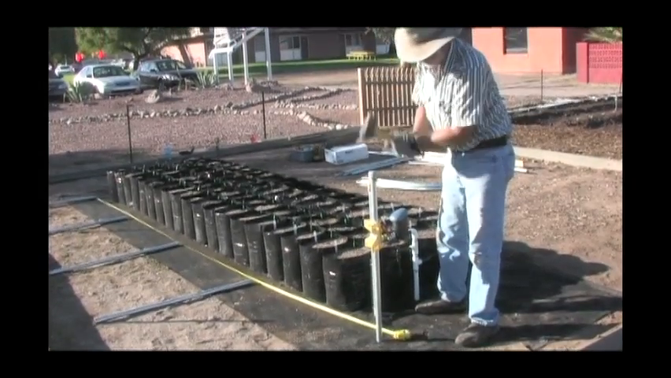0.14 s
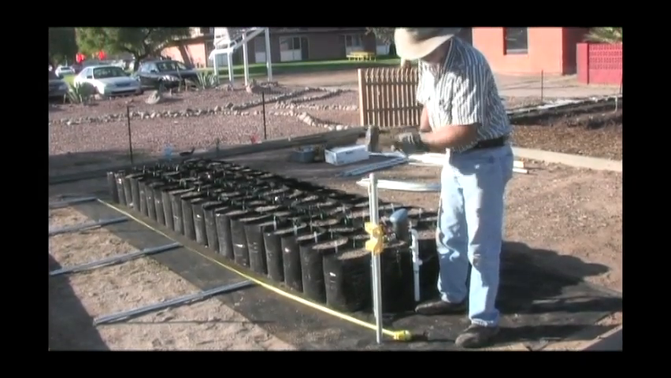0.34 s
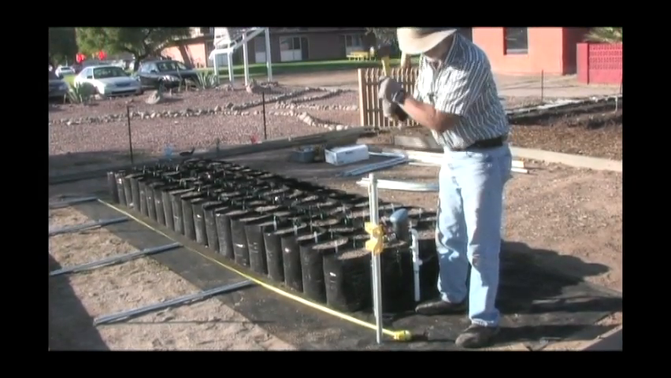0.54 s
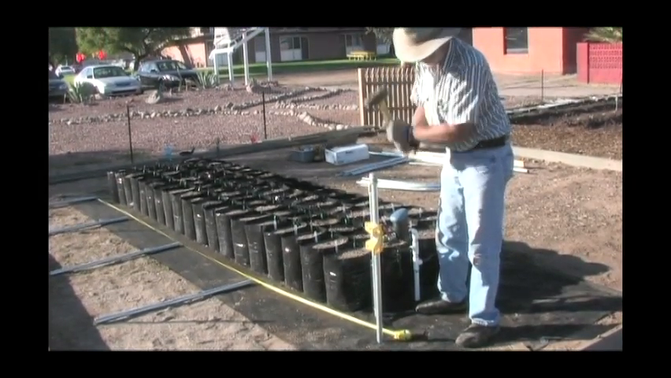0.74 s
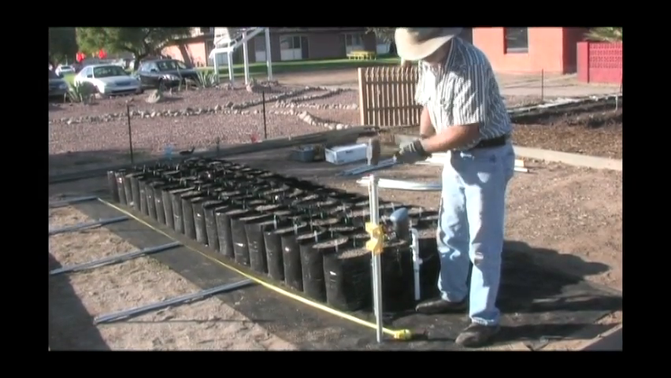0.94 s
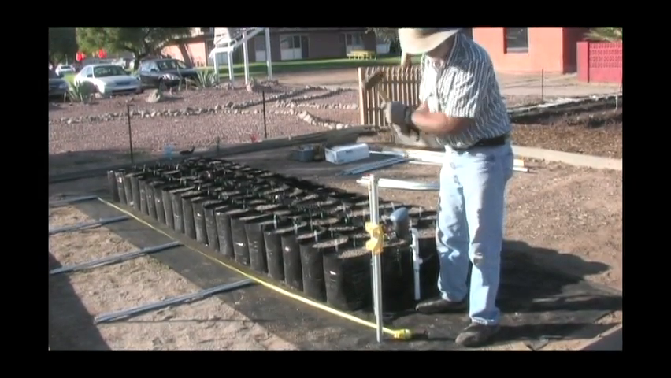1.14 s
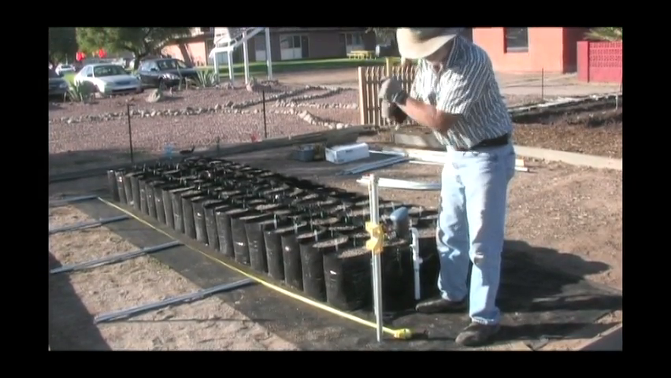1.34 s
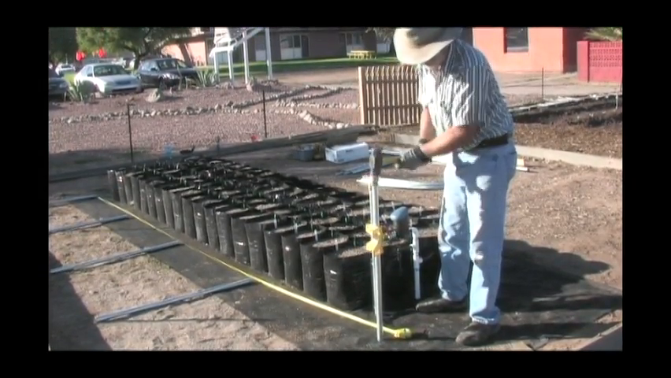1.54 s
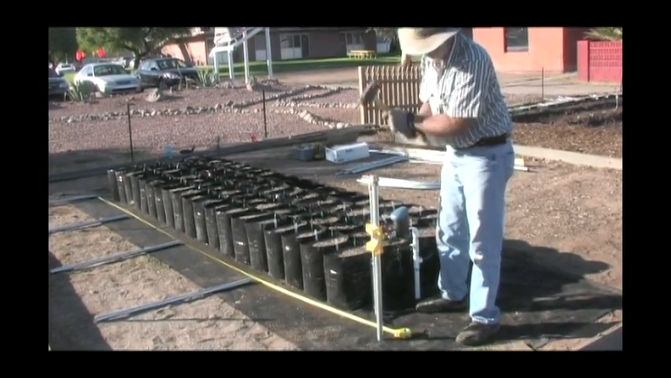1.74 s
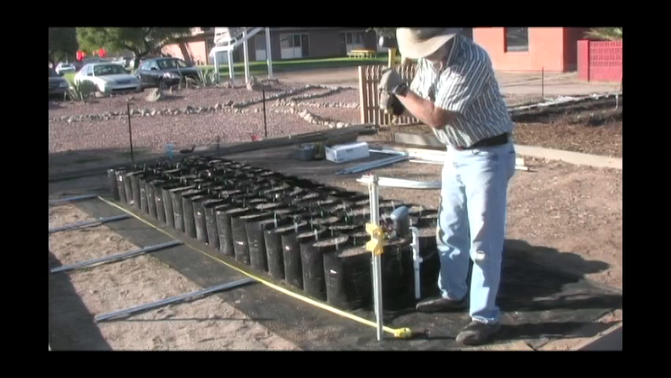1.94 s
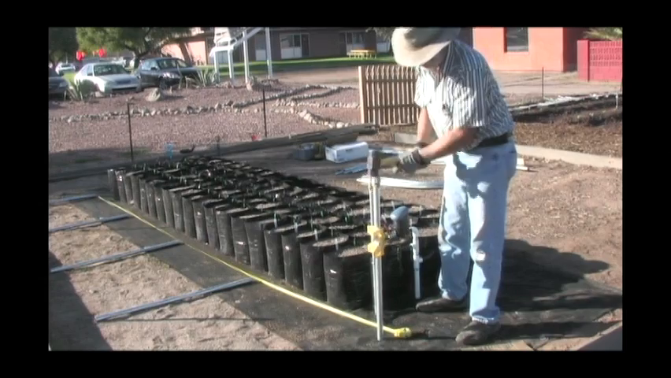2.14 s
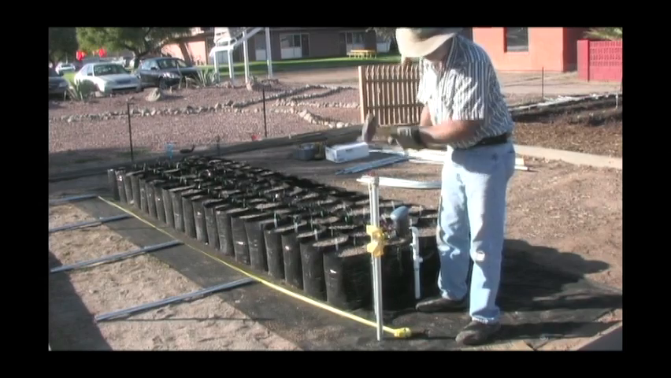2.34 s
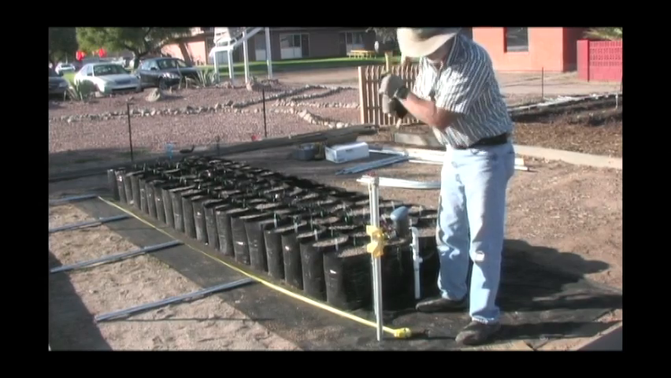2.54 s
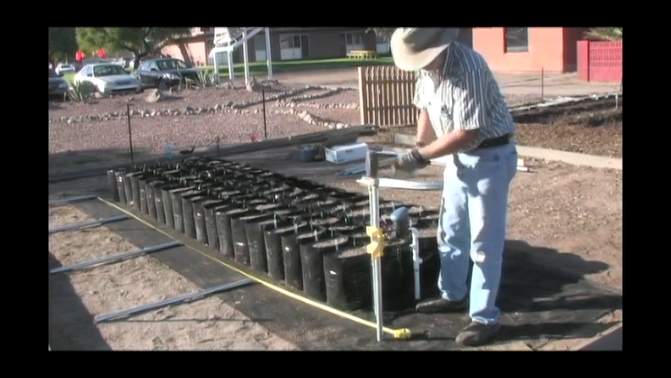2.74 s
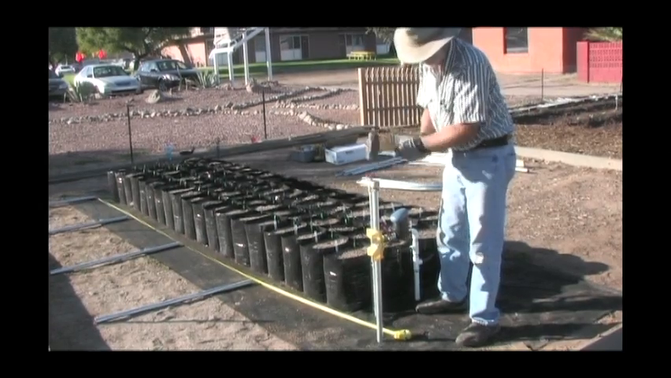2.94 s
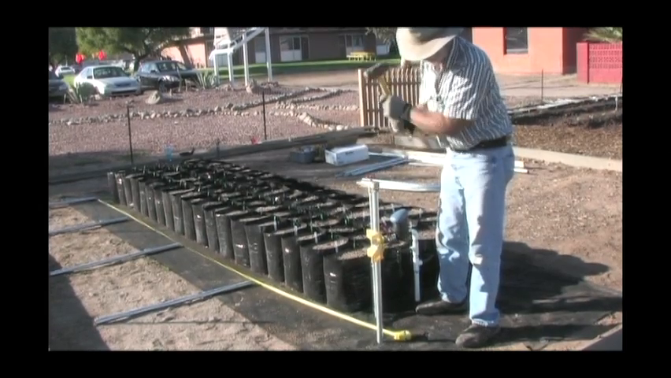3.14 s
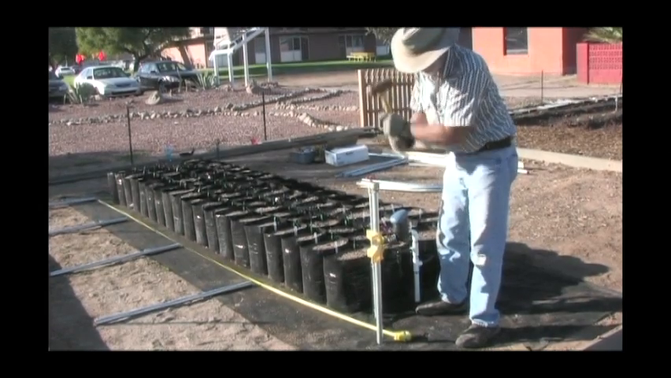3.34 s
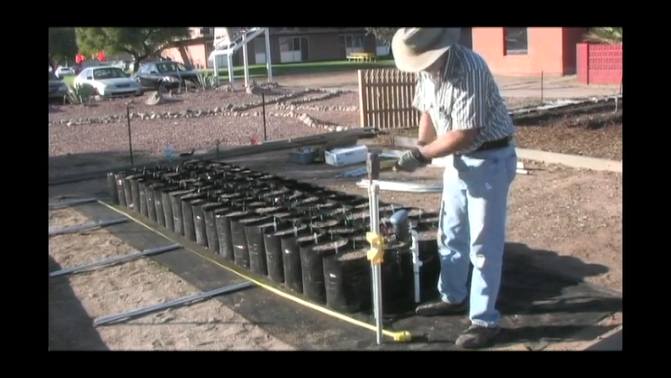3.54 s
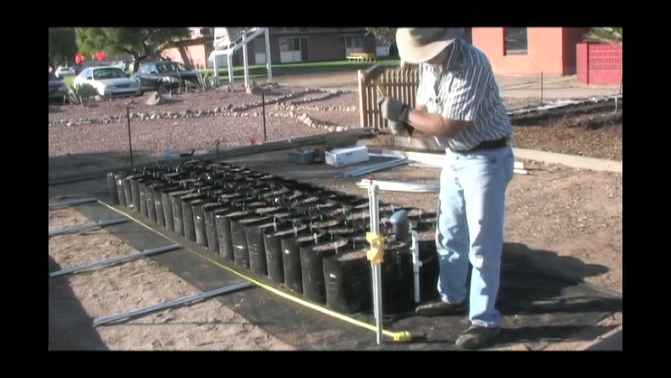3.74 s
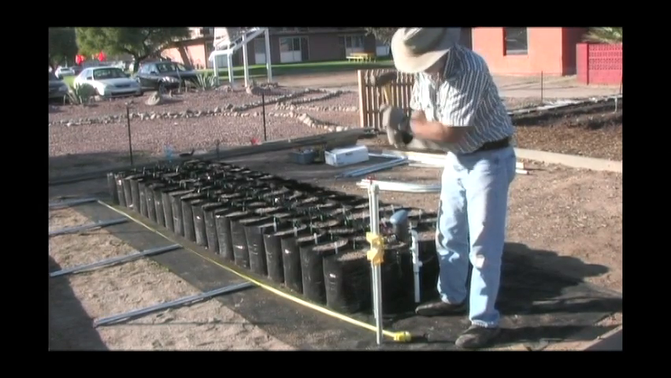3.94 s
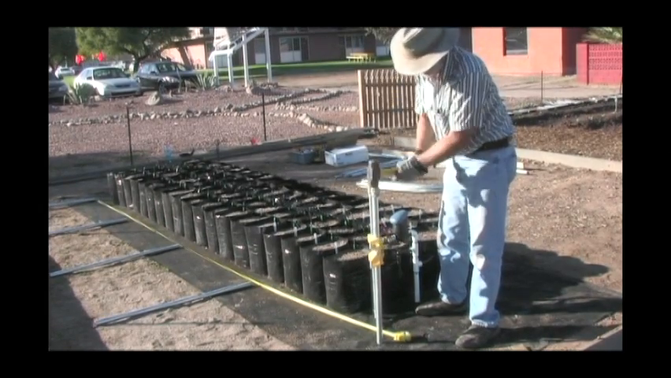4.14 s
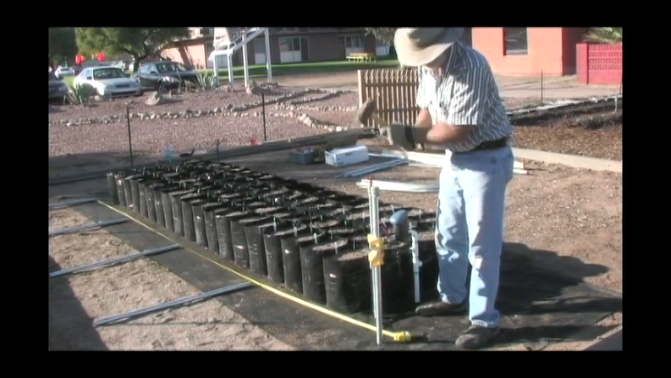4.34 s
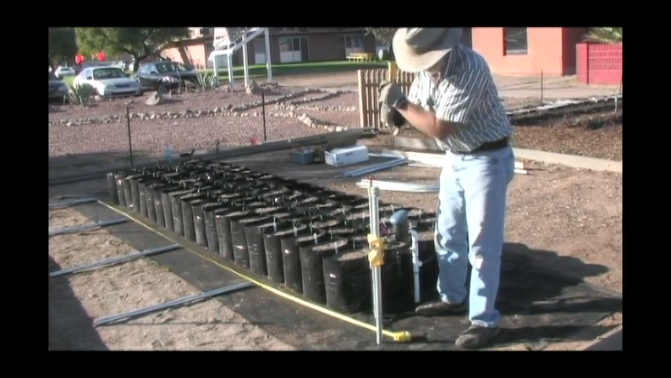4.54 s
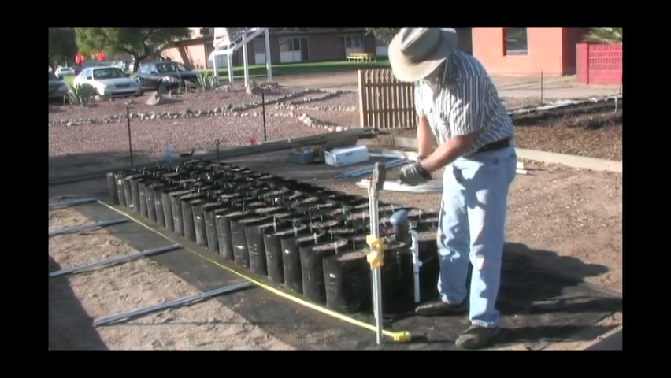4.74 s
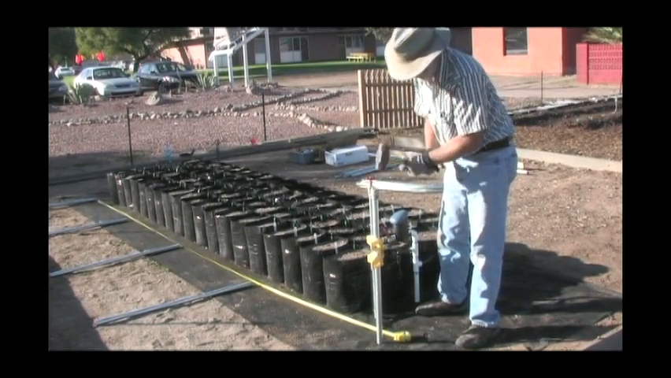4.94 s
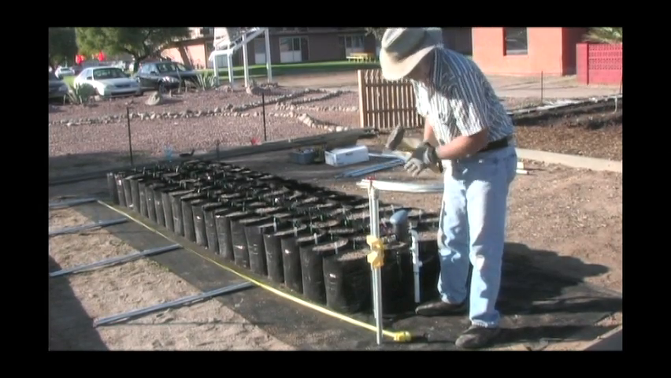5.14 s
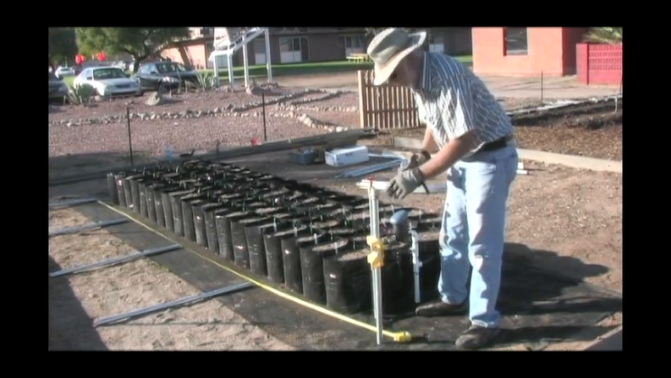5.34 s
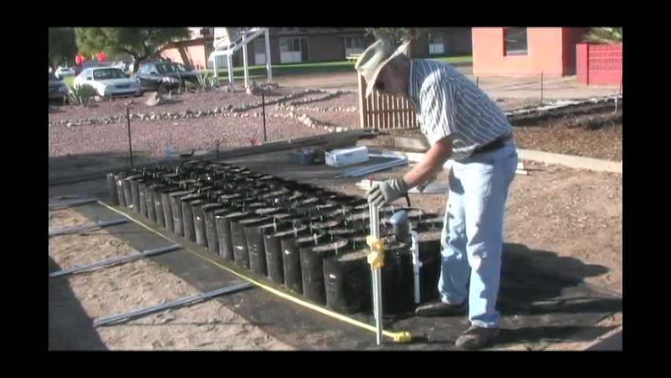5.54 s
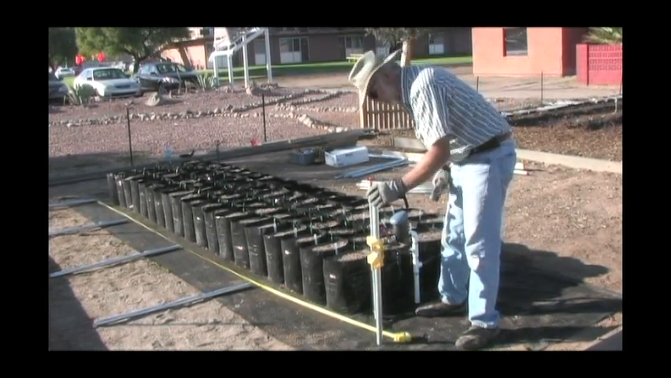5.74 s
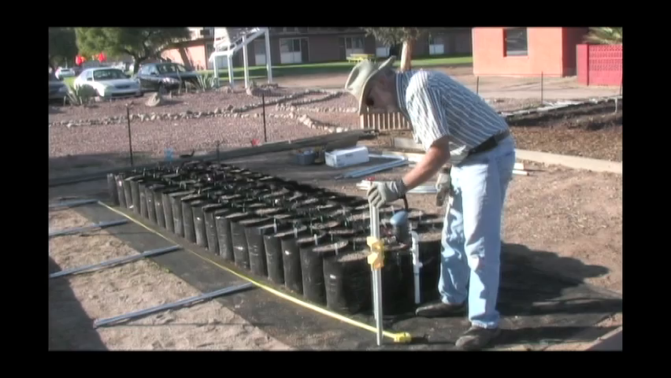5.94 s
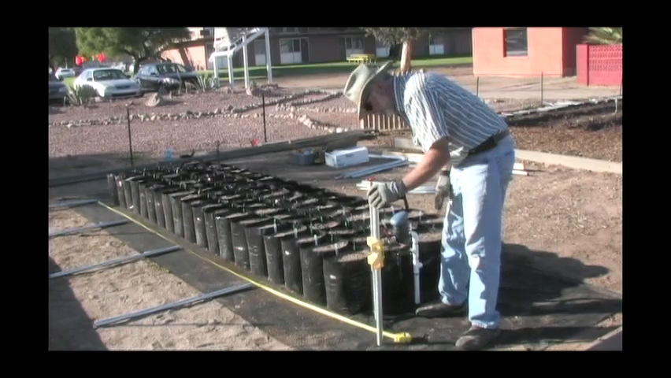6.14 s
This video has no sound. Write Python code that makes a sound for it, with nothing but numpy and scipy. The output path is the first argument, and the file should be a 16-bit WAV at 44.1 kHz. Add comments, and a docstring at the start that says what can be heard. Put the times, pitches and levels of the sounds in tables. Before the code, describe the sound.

The tail of an earlier blow opens the scene, then eight steady, hard steel clanks ring out close by, each short and crashing with a thin high ring and grainy outdoor echoes. The microphone distorts on the impacts and its level dips, then swells back. After the last blow only light metallic taps, dull shoe scuffs, a thin wavering far tone and faint town rumble remain.

```python
"""A garden yard among buildings: a hand sledge drives a steel post into a bed, over a far rumble of town.
Eight hard clanks follow the tail of an earlier one; light taps and faint ticks follow as a hand takes hold.
Each blow is a noise crash plus decaying sine modes, singing on near 4.7 kHz; scuffs are filtered noise.
Noise echoes form the yard, shaped noise the town, and a wavering sine a thin far tone.
The clanks overload the microphone; its gain control ducks and swells back up through the echoes."""
import sys
import numpy as np
from scipy import signal
from scipy.fft import rfft, irfft, next_fast_len
from scipy.io import wavfile
from scipy.ndimage import uniform_filter1d

SR = 44100
rng = np.random.default_rng(int(sys.argv[2]) if len(sys.argv) > 2 else 0)


def to_wav(s):
    """Save 16-bit WAV."""
    ch = np.atleast_2d(s).T  # columns
    pcm = np.round(np.clip(ch, -1, 1) * 32767)  # PCM
    wavfile.write(sys.argv[1], SR, pcm.astype(np.int16))


N = 277344


def from_db(db):
    """Amplitude ratio of a level in dB."""
    return 10 ** (np.asarray(db) / 20)


def unit_energy(x):
    """Scale each row to a sum of squares of 1."""
    return x / np.sqrt(np.sum(x ** 2, axis=-1, keepdims=True) + 1e-20)


def at_hz(points, hz):
    """Read a spectrum on a log-frequency axis."""
    points = np.array(points)
    return np.interp(np.log(hz + 1), np.log(points[:, 0]), points[:, 1])


def fade(t, t60):
    """Exponential decay, 60 dB down after t60 seconds."""
    return from_db(-60 * t / t60)


def burst(t, t60):
    """Dying noise of unit energy."""
    return unit_energy(rng.standard_normal(len(t)) * fade(t, t60))


def colour(x, spectrum):
    """Causal (minimum-phase) filter with the given spectrum."""
    n = 2 * next_fast_len(x.shape[-1])
    level_db = at_hz(spectrum, np.fft.rfftfreq(n, 1 / SR))
    cepstrum = irfft(np.log(from_db(level_db)))
    # fold the cepstrum onto positive times
    cepstrum[1:n // 2] *= 2
    cepstrum[n // 2 + 1:] = 0
    response = np.exp(rfft(cepstrum))
    return irfft(rfft(x, n) * response)[..., :x.shape[-1]]


def high_pass(x, hz, order=2):
    """Take away what lies below hz."""
    return signal.sosfilt(signal.butter(order, hz, "high", fs=SR, output="sos"), x)


def drift(per_s):
    """Slow chance over the whole scene: a new value per_s times a second, joined by lines."""
    return np.interp(np.arange(N) / SR * per_s, np.arange(N), rng.standard_normal(N))


def town(level_db=-46, left_db=0.87):
    """Steady far traffic and air: shaped noise, left and right most alike near 1 kHz."""
    # rumble spectrum: (frequency [Hz], relative level [dB])
    town_spectrum = [(20, -22), (40, -8.5), (62, 0), (130, -3), (250, -4.5), (700, -6), (1200, -12),
                     (2000, -18), (3200, -21.5), (5000, -39), (8000, -40.5), (15000, -44)]
    # left-right correlation: (frequency [Hz], correlation [-1 to 1])
    likeness = [(60, 0.1), (240, 0.099), (950, 0.33), (4000, .1)]
    hz = np.fft.rfftfreq(N, 1 / SR)
    alike = np.clip(at_hz(likeness, hz), -1, 1)
    mid, side = rfft(rng.standard_normal((2, N)))
    both = np.sqrt(1 + alike) * mid + np.sqrt(1 - alike) * side * [[1], [-1]]
    shaped = irfft(both * from_db(at_hz(town_spectrum, hz)), N)
    noise = unit_energy(shaped) * np.sqrt(N)  # unit RMS
    return noise * from_db(level_db + left_db * np.array([[1], [-1]]))


def whine(hz=2945, waver_hz=5, flutter_db=2, per_s=25, rest_db=-70.5, fade_s=0.061):
    """A thin far tone, wavering in pitch and level; swells rise where they exceed its rest level."""
    # swells of the tone: (start [s], length [s], level before flutter [dB])
    swell_times = [(5.451, 0.26, -64.5), (5.902, 0.27, -70.5)]
    t = np.arange(N) / SR
    phase = 2 * np.pi * np.cumsum(hz + waver_hz * drift(per_s)) / SR
    tone = np.sqrt(2) * np.sin(phase)
    swells = 0
    for start_s, length_s, db in swell_times:
        edge_s = np.minimum(t - start_s, start_s + length_s - t)
        swells = swells + from_db(db) * np.clip(edge_s / fade_s, 0, 1)
    flutter = from_db(flutter_db * drift(per_s))
    return np.maximum(from_db(rest_db), swells) * flutter * tone


def echo(t, delay_s, t60, low_hz, order=2, rise_s=0.0037):
    """One smeared reflection of a click, without its lows."""
    smear = unit_energy(burst(t, t60) * (1 - np.exp(-t / rise_s)))
    return np.roll(high_pass(smear, low_hz, order=order), round(delay_s * SR))


def yard(near_db=-17.0, near_t60=0.25, far_db=-22.5, far_t60=1.0, build_s=0.033, grain_db=2.5):
    """Stereo response without the direct sound: scatter from ground and pots, wall echoes, a grainy far tail."""
    # walls around the yard: (echo delay [s], level before colouring [dB])
    wall_echoes = [(0.048, -30), (0.152, -27.5), (.169, -30), (0.233, -27.5), (.274, -41.5), (0.343, -42.5)]
    # colour of pots, walls and tail: (frequency [Hz], level [dB])
    yard_colour = [(100, -6), (900, -1), (2300, -3.5), (3200, 1.5), (5000, 4), (7000, -2.5), (10000, -1.5),
                   (15000, -21)]
    t = np.arange(SR) / SR
    # far surfaces differ in size: the tail comes in grains of a few milliseconds
    grains = from_db(grain_db * np.interp(t, np.linspace(0, 1, 300), rng.standard_normal(300)))
    sides = []
    for _ in range(2):
        near = from_db(near_db) * burst(t, near_t60)
        tail = grains * burst(t, far_t60) * (1 - np.exp(-t / build_s))
        far = from_db(far_db) * unit_energy(tail)
        pots = from_db(-14) * echo(t, delay_s=0.008, t60=0.093, low_hz=270)
        # rough faces smear each echo and return mostly the short waves
        walls = sum(from_db(db) * echo(t, delay_s, t60=0.022, low_hz=2400, order=1)
                    for delay_s, db in wall_echoes)
        sides.append(near + colour(far + pots + walls, yard_colour))
    return np.array(sides)


def scuffs(level_db=17, t60=0.1, low_hz=520, high_hz=780):
    """Dull, short rubs of a sole on the ground: band-passed dying noise."""
    # soft scuffs: (time [s], relative level [dB])
    rubs = [(5.341, -31.5), (6.064, -36.5), (6.111, -32.5), (6.127, -42)]
    t = np.arange(SR // 4) / SR
    band = signal.butter(2, [low_hz, high_hz], "band", fs=SR, output="sos")
    for s, db in rubs:
        rub = from_db(db + level_db) * unit_energy(signal.sosfilt(band, burst(t, t60)))
        yield s, (rub, rub)


def post_modes(t, sharp=0.01, settle_s=0.017, spread_db=1.5, detune=0.0017, build_s=0.0007):
    """Short clang and long singing of the post; each strike gives its modes new strengths and pitches."""
    # modes of the post; the soil damps most outside the singing cluster:
    # (frequency [Hz], relative level [dB], t60 [s])
    modes = [(1193, -2, 0.052), (1710, 3, 0.022), (2418, -2, 0.035), (3260, -3, 0.056), (3760, -3, 0.084),
             (4690, -26, .6), (4708, -24, .55), (4722, -23, .65), (4752, -22, .3), (4745, -12, .055),
             (4798, -18, .1), (5840, -13, 0.019), (7147, 1, 0.027), (9340, -7, 0.055)]
    clang, singing = np.zeros((2, len(t)))
    # the contact stiffens the post: the ring starts sharp by a small share and settles
    clock = t + sharp * settle_s * (1 - np.exp(-t / settle_s))
    for hz, db, t60 in modes:
        strength, shift = rng.standard_normal(2)
        swing = np.sin(2 * np.pi * (hz * (1 + detune * shift) * clock + rng.random()))
        mode = from_db(db + spread_db * strength) * fade(t, t60) * swing
        if 4600 < hz < 4900:
            singing += mode
        else:
            clang += mode
    return np.array([clang, singing]) * (1 - np.exp(-t / build_s))


def crash(t60, spectrum, rise_s=0.00014, spread_s=0.002009, size=4096, count=60):
    """Countless short modes, of unit energy; bending waves carry highs along the steel faster than lows."""
    t = np.arange(size) / SR
    khz = np.fft.rfftfreq(size, 1 / SR) / 1000
    modes = rfft(burst(t, t60) * (1 - np.exp(-t / rise_s)))
    # the hard contact feeds all pitches alike
    modes = modes / np.sqrt(uniform_filter1d(np.abs(modes) ** 2, count))
    # travel time falls with the root of frequency: scale spread_s at 1 kHz, zero at 16 kHz
    cycles = spread_s * 1000 * (2 * np.sqrt(khz) - khz / 4)
    wave = irfft(modes * np.exp(-2j * np.pi * cycles))[:size // 2]
    return unit_energy(colour(np.pad(wave, (0, SR - len(wave))), spectrum))


def handling_ticks(count=4, from_s=5.15, to_s=5.9, level_db=-66, spread_db=2.5, singing_db=-0.5):
    """The glove brushes the post: faint ticks at uneven times, as (time, level, singing) rows."""
    slots = (np.arange(count) + rng.random(count)) / count
    times = from_s + slots * (to_s - from_s)
    return [(s, level_db + spread_db * rng.standard_normal(), singing_db) for s in times]


def taps(crash_db=32, crash_t60=0.026, clang_db=-2, held_t60=0.22, thrown_db=-5):
    """Light knocks; the steel resting on the post bends and shortens its ring."""
    # knocks of steel on the post, rebounds among them:
    # (time [s], relative level [dB], relative singing level [dB])
    knocks = [(.243, -27.5, -10), (0.305, -28.5, 3), (2.837, -24, 10), (2.879, -33.5, 19),
              (4.126, -24.5, 0), (5.718, -52, 30.5), (5.763, -55.5, 2), (5.775, -47, 20),
              (5.929, -41.5, 21.5), (6.163, -77.5, 38)]
    # softer spectrum of a light knock: (frequency [Hz], relative level [dB])
    knock_spectrum = [(100, -27.5), (600, -10), (1000, -1), (2200, -2.5), (3800, -6.5), (5500, 1),
                      (7300, -4), (9500, -21.5), (15000, -31.5)]
    t = np.arange(SR) / SR
    for s, db, singing_db in [*knocks, *handling_ticks()]:
        clang, singing = post_modes(t, sharp=0.019)
        held_singing = from_db(singing_db) * singing * fade(t, held_t60)
        ring = from_db(clang_db) * clang + held_singing
        knock = from_db(db) * (from_db(crash_db) * crash(crash_t60, knock_spectrum) + ring)
        yield s, (knock, from_db(thrown_db) * knock)


def contact(sound, treble_db, favoured_hz, lift_db=1.5, half_width_octaves=0.43):
    """The spot struck lifts one region of pitch; the squarer the head lands, the more treble."""
    width = 2 ** half_width_octaves
    lift = [(favoured_hz / width, 0), (favoured_hz, lift_db), (favoured_hz * width, 0)]
    return colour(colour(sound, lift), [(3500, 0), (7000, treble_db)])


def hammer(crash_db=30, crash_t60=0.065, clang_db=0, near_singing_db=-3, even_db=28.5,
           thrown_clank_db=-9, thrown_singing_db=5):
    """Each blow: a crash plus the ring of the post, coloured by how squarely the head lands."""
    # hammer blows: (time [s], relative force [dB], treble [dB],
    # pitch favoured by the spot struck [Hz], relative singing level [dB])
    blows = [(-0.46, -4.5, -2.5, 1750, 9.5), (0.1835, -2.3, 1.5, 3200, 1), (0.8369, -1.2, -4, 1730, 5),
             (1.4941, -0.8, -2, 2013, 1), (2.1515, -3.5, 1, 1750, 9.5), (2.7909, -3, 2, 2100, 2.5),
             (3.4407, -3.5, 2.5, 1730, 7), (4.081, -3, 1, 1180, 9), (4.7342, -3.5, 0.5, 3300, -2.5)]
    # crash of steel on steel: (frequency [Hz], relative level [dB])
    crash_spectrum = [(40, -25.5), (130, -27.5), (400, -9), (900, 2), (1800, 3), (4000, 3.5), (6800, 3.5),
                      (8500, -5.5), (11000, -11.5), (15500, -20)]
    t = np.arange(SR) / SR
    # summed over all directions off the post, much of the crash has an even spectrum
    even_crash = unit_energy(colour(signal.unit_impulse(SR), crash_spectrum))
    for s, force_db, treble_db, favoured_hz, singing_db in blows:
        clang, singing = post_modes(t)
        clank = from_db(crash_db) * crash(crash_t60, crash_spectrum) + from_db(clang_db) * clang
        direct = clank + from_db(singing_db + near_singing_db) * singing
        thrown = from_db(even_db) * even_crash + from_db(thrown_clank_db) * clank
        thrown = thrown + from_db(singing_db + thrown_singing_db) * singing
        yield s, from_db(force_db) * contact(np.array([direct, thrown]), treble_db, favoured_hz)


def at_ports(sound, lag_s=0.000005):
    """Direct sound reaches the right microphone port a fraction of a sample late (all-pass delay)."""
    c = (1 - lag_s * SR) / (1 + lag_s * SR)
    return np.array([sound, signal.lfilter([c, 1], [1, c], sound)])


def add(out, sound, s):
    """Mix a sound in at time s, cut to the scene's ends."""
    at = round(s * SR)
    first, last = max(at, 0), min(at + sound.shape[-1], N)
    out[:, first:last] += sound[:, first - at:last - at]


def scene():
    """Everything at the post arrives once directly and once by way of the yard."""
    out = town() + whine()
    response = yard()
    for s, (direct, thrown) in [*scuffs(), *taps(), *hammer()]:
        add(out, at_ports(direct), s)
        add(out, signal.fftconvolve(thrown[None], response, axes=1), s)
    return out


def gain_control(x, threshold_db=-9, release_s=0.14, attack_s=0.0046):
    """Peaks over the threshold pull the gain down within milliseconds; it creeps back afterwards."""
    peak_db = 20 * np.log10(np.abs(x).max(axis=0) + 1e-9)
    over_db = np.maximum(peak_db - threshold_db, 0)
    # running peak hold whose dB value decays exponentially
    relax = np.exp(np.arange(N) / SR / release_s)
    held_db = np.maximum.accumulate(over_db * relax) / relax
    pole = np.exp(-1 / (attack_s * SR))
    reduction_db = signal.lfilter([1 - pole], [1, -pole], held_db)
    return x * from_db(-reduction_db)


def record(dry, top=0.71, low_cut_hz=100, soft_hz=14000, cutoff_hz=16000):
    """Gain control comes too late for each clank's front, which overloads; deep bass and top are cut."""
    overloaded = top * np.tanh(gain_control(dry) / top)
    thinned = high_pass(overloaded, low_cut_hz)
    softened = signal.sosfilt(signal.butter(1, soft_hz, fs=SR, output="sos"), thinned)
    return signal.sosfilt(signal.ellip(8, 0.3, 70, cutoff_hz, fs=SR, output="sos"), softened)


dry = scene()
out = record(dry)
to_wav(out)
```